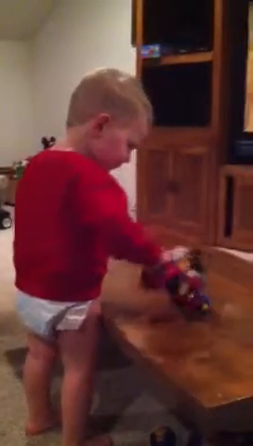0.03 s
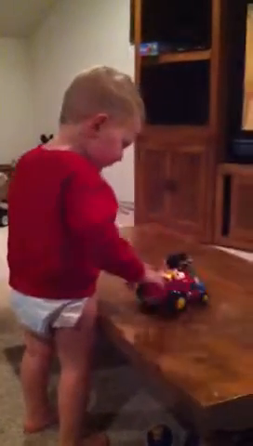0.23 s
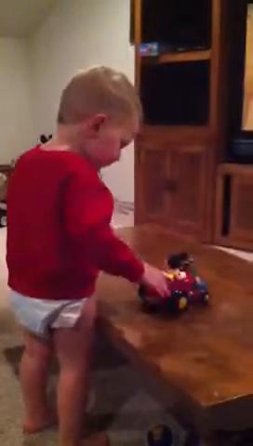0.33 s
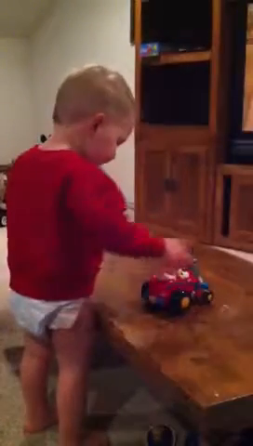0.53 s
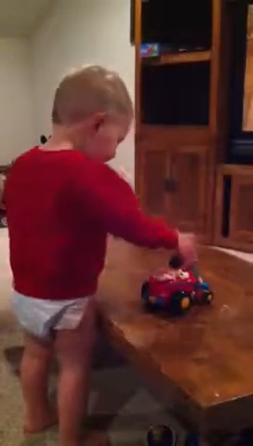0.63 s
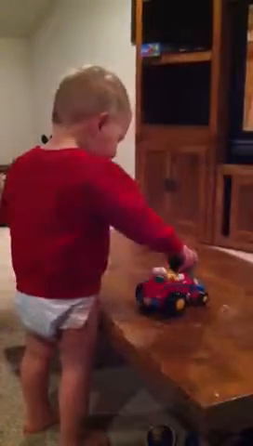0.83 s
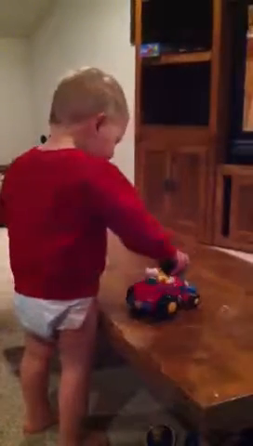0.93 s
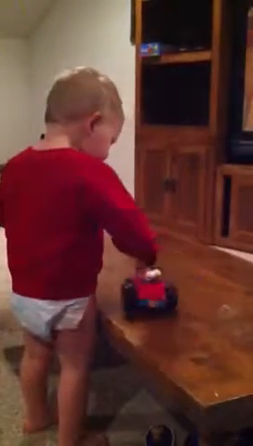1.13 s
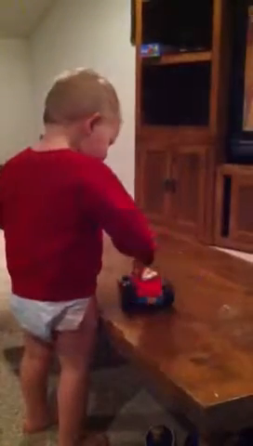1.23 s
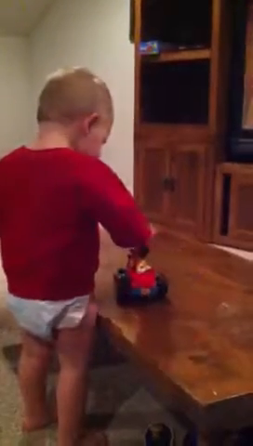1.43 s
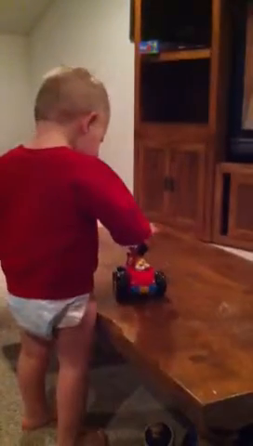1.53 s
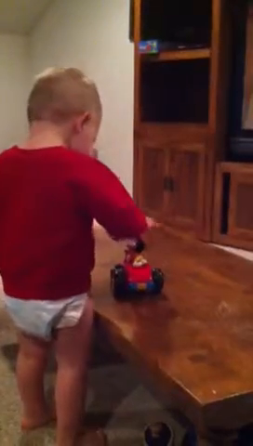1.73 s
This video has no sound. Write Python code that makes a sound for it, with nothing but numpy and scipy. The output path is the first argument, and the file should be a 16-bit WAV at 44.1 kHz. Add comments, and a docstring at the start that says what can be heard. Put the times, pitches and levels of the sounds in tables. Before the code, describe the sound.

A plastic toy car lands on a wooden table with one sharp knock at about 0.2 seconds, bouncing briefly as the tabletop gives a short boom. Its gears whirr and tick faintly from the start, fading by 0.6 seconds. From 0.8 seconds come much quieter finger taps, then tyre scuffs, tiny squeaks, a low rolling hum and loose plastic ticks until about 1.7 seconds, in a quiet room.

```python
"""A plastic toy car is tipped back onto its wheels on a wooden table in a living room.
Its gears whirr faintly from the start. At 0.2 s it lands with one sharp knock and bounces;
the shell rings and the table top booms. From 0.8 s it is nudged, swivelled and rolled a little:
fingers tap, the tyres scuff and chirp, the table drones under the wheels, loose parts tick."""
import sys
import numpy as np
from scipy import signal
from scipy.fft import rfft, irfft, next_fast_len
from scipy.io import wavfile

SR = 44100
rng = np.random.default_rng(int(sys.argv[2]) if len(sys.argv) > 2 else 0)


def unload_wav(signal):
    """Save mono or channel-first audio to the path in sys.argv[1] as 16-bit WAV at rate SR, clipped to [-1, 1]."""
    wavfile.write(
        sys.argv[1],
        SR,
        np.round(np.clip(np.atleast_2d(signal).T, -1, 1) * 32767).astype(np.int16),
    )


N = 79380
T = np.arange(N) / SR
CUTOFF_HZ, TAIL_RISE_S = 15750, 0.0035


def from_db(db):
    """Decibels to gain."""
    return 10 ** (np.asarray(db) / 20)


def unit_rms(x):
    """Scale to unit rms."""
    return x / np.sqrt(np.mean(x ** 2) + 1e-20)


def envelope(rows):
    """Gain along a curve of time_s, level_db."""
    return from_db(np.interp(T, *np.transpose(rows)))


def decay(t60_s, hold_s=0):
    """Hold, then exponential decay."""
    return from_db(-60 * np.maximum(T - hold_s, 0) / t60_s) + 1e-18


def swell(rise_s):
    """Smooth rise from silence."""
    return 1 - np.exp(-(T / rise_s) ** 2)


def delay(x, start_s):
    """Start x at start_s."""
    return np.concatenate([np.zeros(max(int(start_s * SR), 0)), x])[:N]


def noise():
    """White noise."""
    return rng.standard_normal(N)


def lowpass(x, cutoff_hz):
    """Second-order low-pass."""
    return signal.sosfilt(signal.butter(2, cutoff_hz, fs=SR, output="sos"), x)


def drift(rate_hz):
    """Random wander, unit rms."""
    return unit_rms(lowpass(rng.standard_normal(N + SR), rate_hz)[SR:])


def sine(pitch_hz):
    """Sine following a pitch curve."""
    return np.sin(2 * np.pi * np.cumsum(pitch_hz) / SR)


def colour(x, spectrum, tilt_db_per_oct=0):
    """Minimum-phase filter of unit power gain: a spectrum, tilted above 500 Hz."""
    size = next_fast_len(N + SR // 4, True) // 2 * 2
    octave = np.log2(np.maximum(np.arange(size // 2 + 1) * SR / size, 1))
    freq_hz, gain_db = np.transpose(spectrum)
    tilt_db = tilt_db_per_oct * np.clip(octave, np.log2(500), np.log2(CUTOFF_HZ))
    gain = unit_rms(from_db(np.interp(octave, np.log2(freq_hz), gain_db) + tilt_db))
    cepstrum = irfft(np.log(gain))
    cepstrum[1:size // 2] *= 2
    cepstrum[size // 2 + 1:] = 0
    return irfft(rfft(x, size) * np.exp(rfft(cepstrum)), size)[:N]


def room_tone():
    """Quiet, steady, low noise."""
    # air spectrum: freq_hz, gain_db
    spectrum = [(70, -20), (100, -6.5), (150, 8.5), (220, 10), (330, 0), (1100, -2), (1700, -13),
                (3000, -14), (8000, -14), (15500, -16)]
    return from_db(-69.5) * colour(noise(), spectrum)


def table_drone(pitch_hz=153.5, wander_hz=5):
    """Rolling wheels make the table drone."""
    # drone envelope: time_s, level_db
    levels = [(.6, -97), (.86, -77.5), (1.07, -75.5), (1.18, -82.5), (1.27, -74), (1.32, -62.5),
              (1.51, -66.5), (1.58, -85.5), (1.66, -67.5), (1.74, -90)]
    drone = sine(pitch_hz + wander_hz * drift(25)) * from_db(2.4 * drift(20))
    return envelope(levels) * unit_rms(drone)


def tyre_scuff(grain_db=1.3):
    """Tyres rub over the wood: grainy noise."""
    # scuff envelope: time_s, level_db
    levels = [(.8, -82), (.93, -75.5), (1.06, -83.5), (1.13, -64), (1.24, -70.5), (1.3, -66.5),
              (1.37, -69.5), (1.5, -63.5), (1.56, -73.5), (1.8, -77)]
    # friction spectrum: freq_hz, gain_db
    spectrum = [(90, -19.5), (450, -8), (860, -1.5), (1490, -2), (4900, -13), (6100, -9.5), (7200, -25.5),
                (15000, -23)]
    friction = noise() * from_db(grain_db * drift(90))
    return envelope(levels) * unit_rms(colour(friction, spectrum))


def swivel(judder_db=2.5, judder_hz=110):
    """Tyres catch as the car turns: juddering friction excites resonances that swell and fade."""
    # scrapes: centre_s, half_length_s, pitch_hz, level_db
    scrapes = [(1.143, .022, 460, -72), (1.172, .022, 860, -66), (1.145, .035, 1490, -70),
               (1.16, .08, 2090, -74), (1.155, .06, 4100, -75), (1.14, .035, 6130, -73.5),
               (1.305, .02, 750, -68)]
    out = np.zeros(N)
    for centre_s, half_length_s, pitch_hz, level_db in scrapes:
        tone = unit_rms(signal.lfilter(*signal.iirpeak(pitch_hz, Q=45, fs=SR), noise()))
        out += from_db(level_db) * tone * np.exp(-((T - centre_s) / half_length_s) ** 2)
    return out * unit_rms(from_db(judder_db * drift(judder_hz)))


def tyre_chirps(wobble=0.07, flutter_db=2.5):
    """Slipping tyres give short, unsteady, falling tones."""
    # slips: start_s, length_s, start_hz, end_hz, level_db
    slips = [(0.168, 0.038, 1380, 1122, -49.5), (1.274, 0.036, 1290, 1270, -61.5),
             (1.399, 0.023, 1260, 1125, -60.5), (1.442, 0.07, 1240, 1234, -65)]
    out = np.zeros(N)
    for start_s, length_s, start_hz, end_hz, level_db in slips:
        progress = np.clip((T - start_s) / length_s, 0, 1)
        pitch_hz = (start_hz + (end_hz - start_hz) * progress) * (1 + wobble * drift(350))
        arch = np.sqrt(2 * np.abs(np.sin(np.pi * progress)))
        out += from_db(level_db + flutter_db * drift(150)) * arch * sine(pitch_hz)
    return out


def gears(teeth_per_s=215, wander=0.06, spread_db=2, tooth_t60_s=0.035):
    """Teeth click past at a nearly even rate, each a noise burst of its own strength."""
    # whirr envelope: time_s, level_db
    levels = [(0, -55), (.05, -56.5), (.1, -63.5), (.15, -53), (.2, -66), (.52, -64), (.65, -83)]
    # tooth click spectrum: freq_hz, gain_db
    spectrum = [(120, -13), (600, -2.5), (2100, 3), (4700, -10), (5800, -4.5), (8100, -14), (15000, -23)]
    teeth_passed = np.floor(np.cumsum(teeth_per_s * (1 + wander * drift(10))) / SR)
    clicks = np.diff(teeth_passed, prepend=0) * from_db(spread_db * noise())
    bursts = irfft(rfft(clicks) * rfft(decay(tooth_t60_s)), N) * noise()
    return envelope(levels) * unit_rms(colour(bursts, spectrum))


def contact(t60_s, tail_db, tail_t60_s, echo_s=0.0071, echo_db=-9):
    """A small contact, its echo off the nearest wall and its room tail."""
    direct = noise() * decay(t60_s)
    tail = from_db(tail_db) * noise() * decay(tail_t60_s) * swell(TAIL_RISE_S)
    return direct + from_db(echo_db) * delay(direct, echo_s) + tail


def taps():
    """Fingers and tyres tap dully."""
    # touches: start_s, level_db
    touches = [(0.78, -58), (1.011, -67), (1.276, -57)]
    # tap spectrum: freq_hz, gain_db
    spectrum = [(90, -21), (600, -1.5), (1300, 3), (3000, -10.5), (5000, -19.5), (15000, -34)]
    out = np.zeros(N)
    for start_s, level_db in touches:
        out += from_db(level_db) * delay(contact(t60_s=0.12, tail_db=-17, tail_t60_s=0.57), start_s)
    return colour(out, spectrum)


def part_ring(pitch_hz, t60_s=0.041, blur_at_1khz_hz=45.5):
    """Struck plastic rings briefly at an unsteady pitch."""
    return decay(t60_s) * sine(pitch_hz + blur_at_1khz_hz * np.sqrt(pitch_hz / 1000) * drift(300))


def loose_parts(grain_db=2.2, grain_hz=450):
    """Loose plastic parts tick: a grainy contact and a short ring."""
    # ticks: start_s, level_db, tilt_db_per_oct
    ticks = [(0.0484, -46.5, -0.5), (0.1108, -44.5, 3.5), (0.1656, -40, -8), (.188, -76, -18),
             (.477, -44, 0), (1.297, -61, -8), (1.3141, -56.5, -9.5), (1.3529, -61, -9.5),
             (1.387, -49, -4.5), (1.4661, -46.5, 0.5), (1.594, -60, -5.5), (1.689, -60.5, -6.5)]
    # tick spectrum: freq_hz, gain_db
    spectrum = [(100, -53.5), (250, -21), (600, -17.5), (1200, -5.5), (3500, -1), (4700, -4), (6600, 3),
                (8100, 3.5), (9300, -13), (15000, -26.5)]
    # part modes: pitch_hz, ring_db
    modes = [(2600, -16), (3300, -14.5), (5800, -16)]
    out = np.zeros(N)
    for start_s, level_db, tilt_db_per_oct in ticks:
        rattle = contact(t60_s=0.027, tail_db=-14, tail_t60_s=0.25)
        rattle *= unit_rms(from_db(grain_db * drift(grain_hz)))
        rings = sum(from_db(ring_db) * part_ring(pitch_hz) for pitch_hz, ring_db in modes)
        out += from_db(level_db) * delay(colour(rattle, spectrum, tilt_db_per_oct) + rings, start_s)
    return out


def table_and_shell(impacts, rise_cycles=2.8, blur_at_1khz_hz=7, damping_hz=10000):
    """Modes of the table top and car shell; each impact adds energy to them."""
    # lowest table mode: pitch_hz, gain_db, t60_s
    boom = (153, -18.5, .27)
    # higher modes: pitch_hz
    modes_hz = [213, 378, 661, 802, 917, 1037, 1096, 1270, 1498, 1830, 1914, 5211, 5643, 5837, 6013, 6196,
                6531, 8112]
    # their strengths: gain_db
    modes_db = [-32, -28.5, -30.5, -31.5, -32, -21.7, -27.5, -28, -23.5, -24, -27, -23.5, -22.5, -27, -25,
                -26, -25, -29]
    modes = [(hz, db, 0.34 / (1 + hz / damping_hz)) for hz, db in zip(modes_hz, modes_db)]
    hardest_db = max(db for _, db, *_ in impacts)
    # weak bounces lose an extra 0.1 dB per dB
    drives = [(start_s, from_db(db + 0.1 * (db - hardest_db))) for start_s, db, *_ in impacts]
    out = np.zeros(N)
    for pitch_hz, gain_db, t60_s in [boom] + modes:
        shape = decay(t60_s) * swell(rise_cycles / pitch_hz)
        energy = sum(delay(drive * shape, start_s) ** 2 for start_s, drive in drives)
        blur_hz = blur_at_1khz_hz * np.sqrt(pitch_hz / 1000) * drift(60)
        out += from_db(gain_db) * np.sqrt(energy) * sine(pitch_hz + blur_hz)
    return out


def landing(clatter_db=-12.5, room_db=-28):
    """Wheels land and bounce: crack, ring of the struck part, clatter, duller room tail, modes."""
    # wheel impacts: start_s, level_db, tilt_db_per_oct, crack_db, part_hz, ring_db
    impacts = [(0.2054, -11, -1.5, -5, 5110, -13.5), (0.214, -24, 10, -4, 2200, -18),
               (0.2239, -26, 8, 3, 6420, -9), (0.2801, -21, -1.5, -11, 5400, -13),
               (0.287, -27.5, 0.5, -10.5, 2900, -7), (0.3229, -29.5, -0.5, -6, 8100, -2.5),
               (0.331, -37.5, -1.5, -2, 1518, 3.5)]
    # contact crack: freq_hz, gain_db
    crack_spectrum = [(110, -43), (250, -13), (1000, 2), (2000, 4.5), (2700, -11), (4000, -9.5),
                      (5800, 7.5), (8200, 0.5), (9100, -12.5), (13800, -8.5), (16000, -17.5)]
    # car and table ringing into the room: freq_hz, gain_db
    tail_spectrum = [(120, -35.5), (175, -9), (230, -0.5), (310, -17.5), (470, -2.5), (580, -12),
                     (1080, 0.5), (1360, -10.5), (1600, -4), (2200, 1), (2600, -2), (4300, -1),
                     (8200, -5.5), (13500, -13.5), (16000, -26.5)]
    out = np.zeros(N)
    for start_s, level_db, tilt_db_per_oct, crack_db, part_hz, ring_db in impacts:
        burst = np.sign(noise()) * decay(t60_s=0.019, hold_s=0.0016)
        crack = from_db(crack_db) * colour(burst, crack_spectrum, tilt_db_per_oct)
        room = from_db(room_db) * lowpass(noise(), cutoff_hz=6260) * decay(t60_s=0.56)
        clatter = from_db(clatter_db) * noise() * decay(t60_s=0.24)
        tail = colour((clatter + room) * swell(TAIL_RISE_S), tail_spectrum, tilt_db_per_oct)
        ring = from_db(ring_db) * part_ring(part_hz)
        out += from_db(level_db) * delay(crack + ring + tail, start_s)
    return out + table_and_shell(impacts)


def scene():
    """The toy on the table over room tone, mono."""
    car = landing() + loose_parts() + taps() + gears()
    tyres = tyre_scuff() + tyre_chirps() + table_drone() + swivel()
    return (car + tyres + room_tone())[None]


def record(dry):
    """Soft clip, then a steep low-pass."""
    rounded = 0.5 * np.tanh(dry / 0.5)
    return signal.sosfilt(signal.ellip(10, 0.2, 80, CUTOFF_HZ, fs=SR, output="sos"), rounded)


dry = scene()
out = record(dry)
unload_wav(out)
```